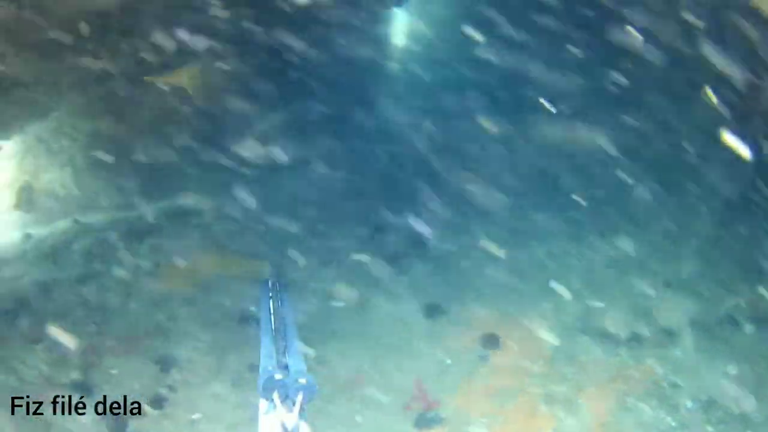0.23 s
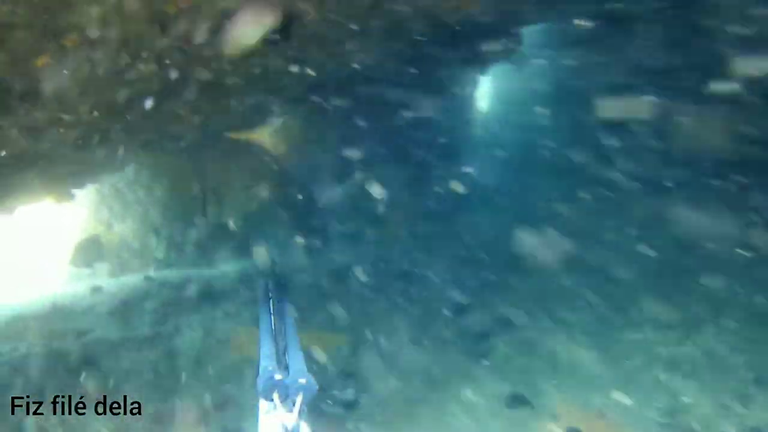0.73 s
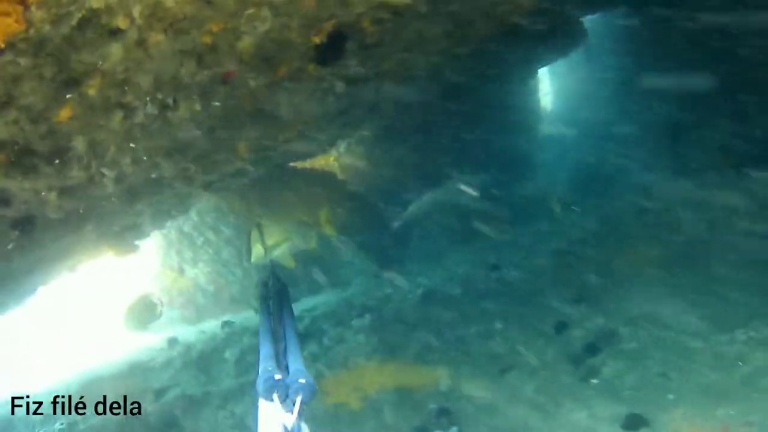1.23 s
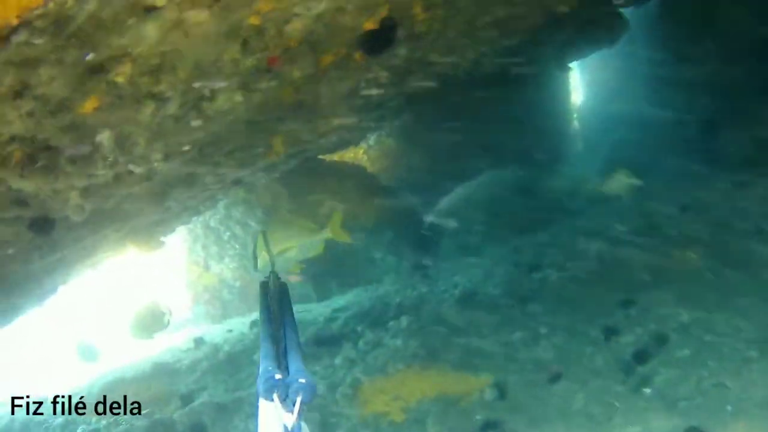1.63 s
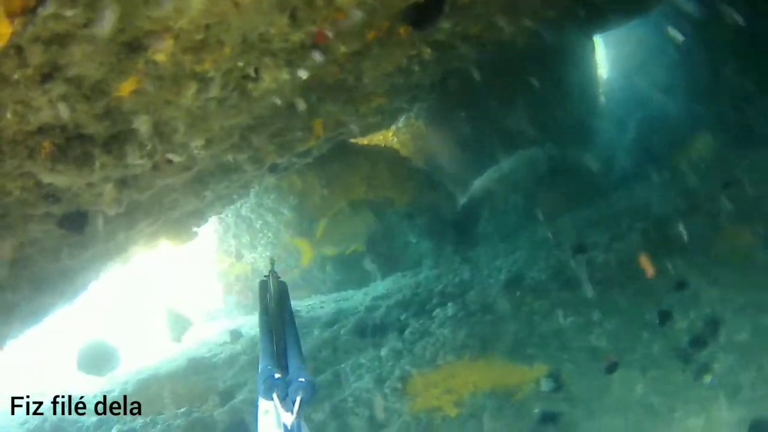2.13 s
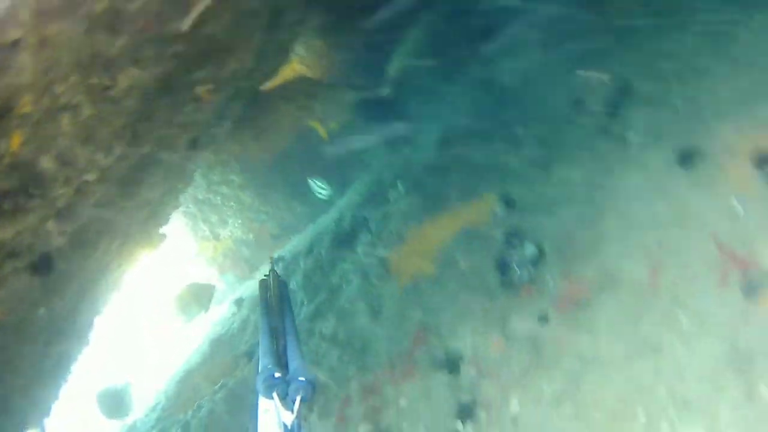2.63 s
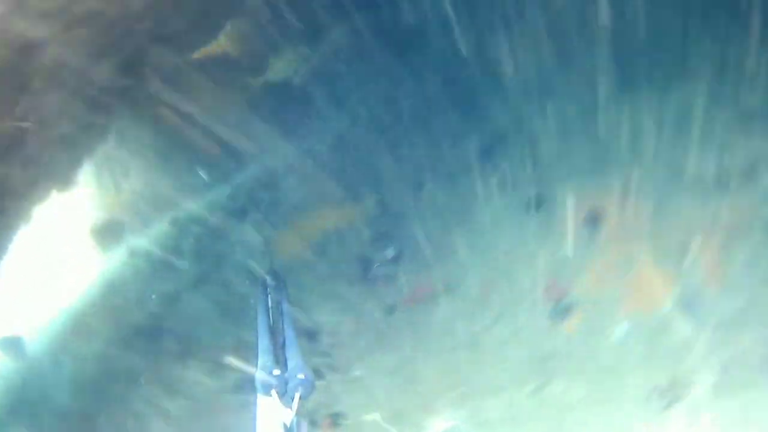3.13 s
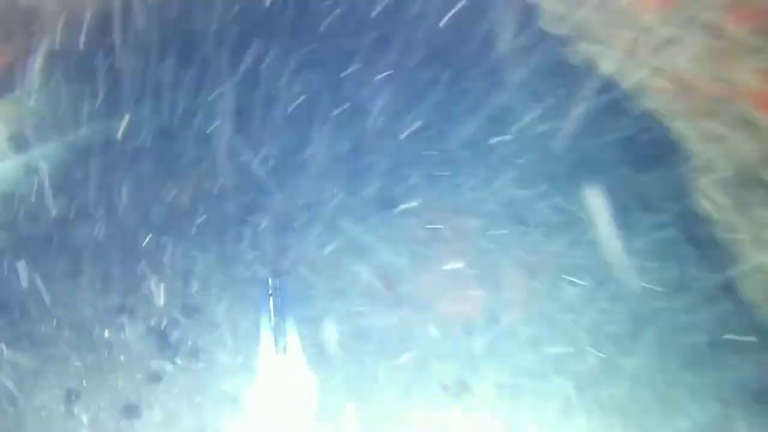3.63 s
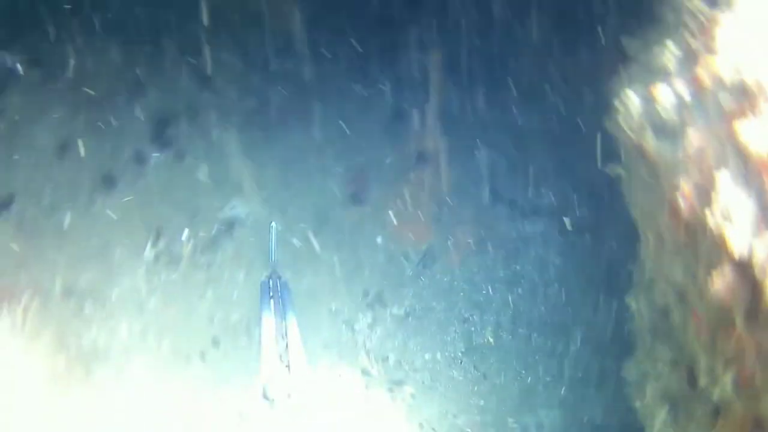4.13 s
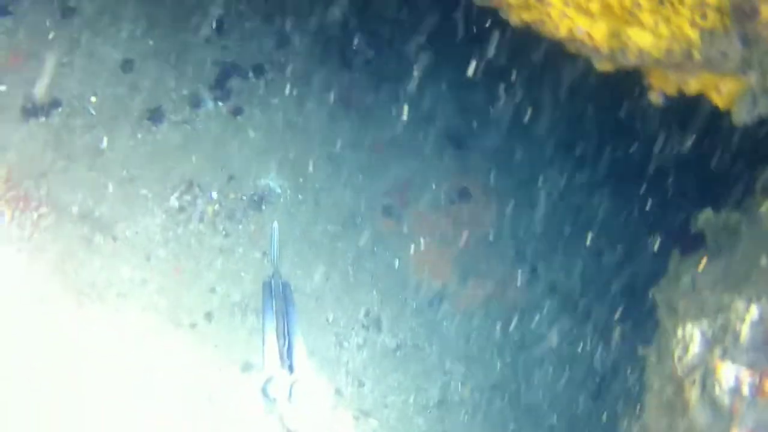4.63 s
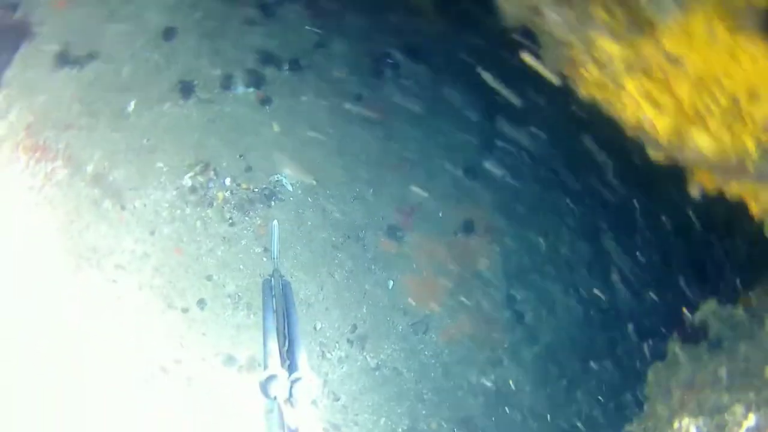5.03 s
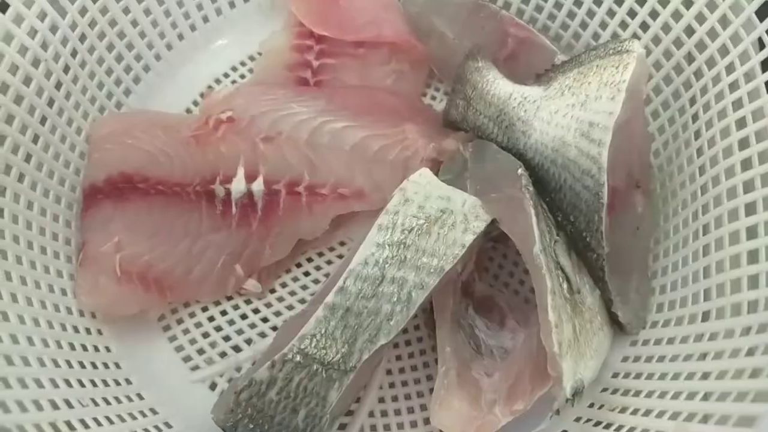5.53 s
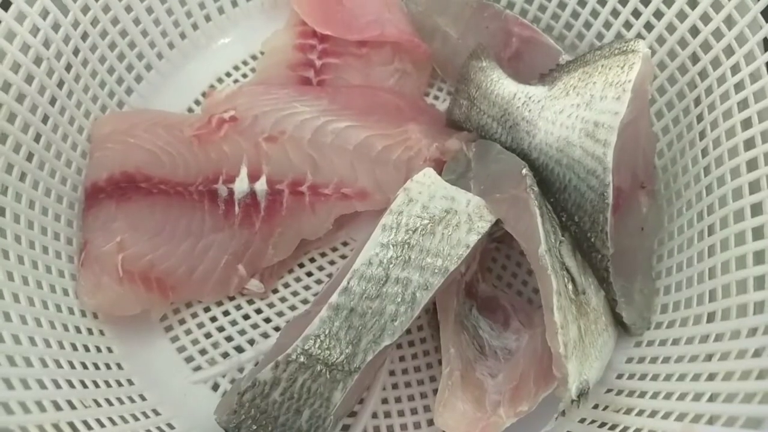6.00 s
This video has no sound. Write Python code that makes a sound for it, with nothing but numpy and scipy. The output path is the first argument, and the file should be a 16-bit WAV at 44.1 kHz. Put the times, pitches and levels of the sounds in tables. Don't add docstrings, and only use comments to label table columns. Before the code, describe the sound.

Muffled underwater crackle with sparse ticks, growing gear knocks, one very loud low thump with scraping, then a fridge hum and thin room hiss.

```python
import sys
import numpy as np
from scipy import signal
from scipy.fft import rfft, irfft, next_fast_len
from scipy.io import wavfile
from scipy.ndimage import uniform_filter1d, map_coordinates

SR = 44100
rng = np.random.default_rng(int(sys.argv[2]) if len(sys.argv) > 2 else 0)


def volts_from_db(level):
    exponent = np.asarray(level, float) / 20
    return 10 ** exponent


def waveform_to_disk(signal):
    frames = np.transpose(np.atleast_2d(signal))
    scaled = np.clip(frames, -1, 1) * 32767
    samples = np.round(scaled).astype(np.int16)
    wavfile.write(sys.argv[1], SR, samples)


N = 276177
CUT_S, KITCHEN_IN_S = 5.45952, 5.498

# [f/Hz, t60/s]
CASE_MODES = [(716.55, 0.0528), (1647.5, 0.0311), (2066, 0.02436), (2428, 0.01895), (3317.6, 0.0284),
              (1052, 0.017), (3913.3, 0.013)]

# [f/Hz, level/dB per Hz]
CRACKLE_SPECTRUM = [(260, -44.5), (450, -24), (568, -7), (704, -1), (1180, -14.5), (1350, -15),
                    (1640, -2.5), (1920, -16), (2350, -9), (2880, -14.5), (3470, -13), (3940, -17.5),
                    (4600, -29), (5980, -77), (10100, -120)]
MURMUR_SPECTRUM = [(40, -35), (70, -4.5), (150, 1.5), (300, -3.5), (500, -5.5), (900, -34), (1300, -78)]
CRACKLE_DB, STIRRED_DB = -72, -21.5
CHORUS_DB, CHORUS_S = 3, 0.04

# [t/s, level/dB]
SURGE = [(0, -50), (.07, -47.5), (.14, -57), (.42, -61.5), (.61, -47.5), (.93, -57.5), (1.03, -48.5),
         (1.5, -59), (1.6, -46), (1.87, -60), (1.95, -49), (2.08, -65.5), (2.33, -48), (2.45, -62.5),
         (2.72, -50), (2.87, -57.5), (3.09, -47), (5.46, -49)]
# [f/Hz, level/dB per Hz]
SWAY_SPECTRUM = [(6, -30), (14, -4), (24, 0), (36, -1), (46, -7), (56, -18), (100, -30), (160, -70)]
# [t/s, peak level/dB, build/s, t60/s]
SHOVES = [
    (3.21, -37, .04, .3),
    (3.53, -41, .03, .25),
    (4.092, -21, .04, .3),
    (4.246, -10.5, .11, .58),
    (5.318, -25, .03, .4),
    (5.444, -33, .015, .3),
]
MOUNT_HZ = 18.8

# [t/s, peak level/dB, low mode over peak/dB, upper modes over peak/dB]
SNAPS = [(.003, -49.5, -3.5, -4.5), (.4052, -52.5, -4.5, -1), (.4581, -55, -22, 5),
         (1.0422, -46, -19, -5.5), (1.0554, -49, -9, -3), (1.4595, -47.5, -11.5, -6),
         (1.777, -46.5, -17.5, -3.5), (1.881, -49, -3.5, 6.5), (2.2575, -39.5, -3.5, -2.5),
         (2.323, -49, -25, 1.5), (2.4411, -48, -9.5, 1.5), (2.4654, -44.5, -9.5, -4.5),
         (2.6522, -43.5, -8, -1), (2.9259, -41, -2, -0.5), (2.9707, -37, -20, -6.5), (3.1953, -46, -1.5, 0),
         (3.3219, -49, -26.5, 1), (3.4662, -49, -8.5, 1), (4.014, -50, -1.5, 3.5), (4.0966, -26, 4, -7),
         (4.1142, -45.5, 5, 0.5), (4.5347, -29.5, -17.5, -6), (4.5557, -38.5, -5, -7),
         (4.6466, -46, -1.5, 2), (4.7175, -44, -4, -5.5), (4.8019, -39.5, 2, -6.5), (4.8535, -36.5, -9, 3),
         (4.95, -34.5, 7.5, -15.5), (5.0155, -51, 7.5, -0.5), (5.4284, -42, -26.5, 4.5)]
# [t/s, peak level/dB]
TICKS = [(.011, -53), (.1157, -62), (1.705, -55.5), (.167, -60), (.2644, -58.5), (.294, -57.5),
         (.3429, -55), (.3792, -57), (.4917, -51), (.5375, -60.5), (.8546, -57), (1.0763, -53),
         (1.1222, -51.5), (1.1609, -55.5), (1.3069, -57.5), (1.4119, -63.5), (1.6241, -53.5),
         (1.6558, -53.5), (1.8498, -57), (1.9111, -59.5), (1.9281, -52), (2.0025, -56), (2.1441, -59.5),
         (2.7066, -58), (2.7388, -57), (2.825, -56.5), (3.3475, -51), (3.4008, -51.5), (3.8945, -52.5),
         (5.1495, -50), (.0548, -57.5), (.1446, -61), (.2094, -65.5), (.5641, -65.5), (.6065, -63.5),
         (.6559, -63.5), (.7417, -69), (.7771, -66), (.8126, -62.5), (.839, -66), (.8974, -60.5),
         (1.0046, -63), (1.292, -64), (1.3473, -67.5), (1.5833, -62.5), (1.7539, -63), (1.9579, -56.5),
         (1.9909, -62), (2.0652, -65.5), (2.1221, -70), (2.1999, -58), (2.4114, -63.5), (2.4304, -56.5),
         (2.5356, -65), (2.5795, -65.5), (2.6229, -77), (2.7736, -58.5), (3.8731, -57), (3.9344, -61),
         (4.0532, -54)]
# [t/s, peak level/dB, low mode over peak/dB, upper modes over peak/dB]
TAPS = [(.076, -40, -10.5, -4.5), (1.2531, -62, 5, -4), (1.4908, -39.5, -3.5, -1.5),
        (1.5353, -43.5, -10, -3), (2.3094, -58, -3, 7.5), (2.382, -52, -9, 3.5), (2.4923, -55.5, -6, -3),
        (2.902, -26, -6.5, 0), (3.0373, -21.5, -27.5, -11), (3.087, -44, 13, 0.5),
        (3.1271, -47.5, 5, -14.5), (3.1533, -37, -4.5, 4), (3.2497, -47, -13, -14), (3.5107, -57, 1.5, 2.5),
        (3.5607, -48.5, -5, -2), (3.5879, -41, -13, 1.5), (3.6204, -42, -8, -10.5),
        (3.6878, -41, -13.5, -5), (3.7303, -38.5, -12, -8.5), (3.7863, -54, -2, -3.5),
        (3.9655, -35, -12, 2), (4.162, -42.5, 8, -9), (4.2103, -36.5, -1.5, -8.5), (4.2572, -31.5, 10, 3),
        (4.3129, -42.5, 28.5, 16), (4.5092, -42, -12, -3.5), (4.755, -38.5, -12.5, -8),
        (4.9943, -46, 5.5, 1), (5.2483, -47, -1, 0), (5.3388, -55.5, 8.5, 5.5), (2.9587, -45.5, -8, -2),
        (3.2944, -54, -11.5, -3.5), (3.5473, -53.5, -8.5, -5.5), (3.696, -44.5, -5, 2),
        (3.706, -49.5, -8.5, -1), (4.223, -45.5, -7.5, 1), (4.236, -44, -10, 1), (4.291, -34, -4, 3),
        (4.3071, -31.5, -5.5, 2.5), (4.3595, -39, 1.5, -5.5), (4.6304, -53, -9, -3.5),
        (4.822, -49.5, -4.5, -1.5), (4.9082, -57.5, -5, -3.5), (5.0943, -61.5, -5.5, -3),
        (5.1337, -56.5, -5.5, -4), (5.1846, -52.5, 3, -2), (5.2355, -54, -8.5, -7.5),
        (5.3073, -55.5, -4, 0.5)]
# [t/s, peak level/dB, low mode over peak/dB, upper modes over peak/dB]
PINGS = [(2.972, -53.5, -19.5, -6), (3.017, -54.5, -19, -3), (3.196, -48, -21, -3),
         (4.4313, -60.5, -20, -3.5), (4.65, -52, -20.5, -2.5), (4.855, -48.5, -20, -5.5),
         (5.35, -56, -20, -1.5), (5.3806, -54.5, -21.5, -4.5)]
TICK_LOW_DB, TICK_UPPER_DB, TICK_STRAY_DB = -11.5, -2.5, 4
SHARP_TOP_DB, BLUNT_TOP_DB, PING_TOP_DB = -3.5, -13.5, 8

# [t/s, peak level/dB, f/Hz, t60/s]
KNOCKS = [(2.902, -29.5, 990, 0.0211), (3.129, -20.5, 530, 0.01335), (3.153, -26, 392, 0.0242),
          (3.697, -36.5, 620, 0.024), (4.197, -37, 215, 0.11), (3.640, -32, 286, 0.073),
          (3.642, -29.5, 669, 0.063), (3.739, -27, 653, 0.0778), (3.741, -22, 303, 0.0365),
          (3.756, -19, 360, 0.0594), (3.768, -20, 293.3, 0.084), (3.776, -28, 210.8, 0.09),
          (4.099, -16.5, 222.5, 0.0727), (4.104, -8, 526, 0.023), (4.164, -25, 298, 0.039),
          (4.225, -22, 254, 0.031), (4.261, -10.5, 203.5, 0.081), (4.264, -18, 575, .06),
          (4.692, -39, 652, 0.0596), (4.95, -34, 195, 0.1264), (4.279, -21, 339, 0.11),
          (4.3165, 0.5, 182.6, 0.0843), (4.332, -25.5, 585, 0.075), (4.339, -17.5, 203, 0.175),
          (4.383, -27, 258, 0.065), (4.796, -34, 215.6, 0.136), (4.949, -18.5, 429.5, 0.0475),
          (4.951, -17.5, 928, .02), (5.273, -39, 410, 0.073), (5.330, -25, 394, 0.022),
          (5.331, -40, 694, .04), (5.342, -35.5, 312, 0.053), (5.357, -40, 252, 0.058),
          (5.275, -41, 685, .05), (4.902, -38, 368.9, .06), (4.753, -42, 229, .06),
          (4.649, -47, 213.6, 0.048), (3.196, -38.5, 301, 0.051), (3.039, -41, 328, 0.045),
          (4.372, -34, 715, .05), (.63, -63, 523, 0.059), (1.195, -56, 713, 0.068),
          (1.205, -61, 484, 0.054), (1.98, -60, 693, 0.055), (2.133, -63, 436, .06),
          (2.292, -56, 763, 0.058), (3.367, -51.5, 716.8, 0.092), (3.514, -53, 726, 0.1)]
# [t/s, peak level/dB, f/Hz, t60/s]
THUDS = [
    (4.255, -21, 41.6, 0.15),
    (4.306, -20, 35, .058),
    (2.8, -61.5, 150, 0.29),
    (5.2, -45.5, 143, 0.109),
]
# [t/s, peak level/dB]
CLUNKS = [(3.367, -39), (3.514, -39.5), (3.622, -43.5)]
CLUNK_HZ, CLUNK_T60_S = 484.5, 0.0886
# [t/s, force/dB]
SCRAPE = [
    (4.24, -56.5),
    (4.256, -22),
    (4.33, -11),
    (4.4, -53),
]
# [f/Hz, level/dB per Hz]
DRAG_SPECTRUM = [(200, -10.5), (400, -2.0), (600, 3.5), (800, -16.0), (1100, -14.0), (1500, -60.0)]
RASP_SPECTRUM = [(900, -11.0), (1500, -3.0), (1900, 3), (2400, -15), (3300, -17), (4100, -25.0),
                 (4500, -53.0), (4800, -100)]
RASP_DB, RASP_GROWS = -27, 1.4
# [t/s, swell by 20 dB/s, fade by 20 dB/s, rub level/dB, rustle level/dB]
STROKES = [(2.42, .35, .3, -65, -82), (2.94, 0.1087, 0.1033, -52, -54.5),
           (3.055, 0.0518, 0.3437, -50.5, -56.5), (3.159, 0.3319, 0.2878, -45.5, -61.5),
           (3.27, 0.2828, 0.25, -50, -65), (3.601, 0.1521, 0.1755, -57, -58),
           (3.64, 0.1721, 0.0426, -52.5, -58), (3.7, 0.1852, 0.055, -51.5, -58),
           (3.93, 0.2161, 0.22, -59, -67), (4.03, 0.21, 0.01, -62.5, -65.5), (4.13, 0.0549, 0.34, -40, -70),
           (4.28, 0.0704, 0.124, -26, -65), (4.65, 0.26, 0.14, -57.5, -61.5), (4.72, 0.5732, 1.5, -53, -68),
           (4.831, 0.1936, 0.1778, -44.5, -62), (4.96, 0.13, 0.2351, -40, -58.5),
           (5.029, 0.2666, 0.09, -44, -59.5), (5.33, 0.3267, 0.22, -51, -63.5)]
RUSTLE_STEEPER = 1.312
# [f/Hz, level/dB per Hz]
RUB_SPECTRUM = [(41, -49), (70, -3), (129, -3), (392, 2), (546, -6.5), (714, -0.5), (797, -14.5),
                (1300, -28), (1690, -45.5), (2860, -120)]
RUSTLE_SPECTRUM = [(600, -38), (950, 8), (1400, -2.5), (2100, 5.5), (2700, -7.5), (3600, -11), (4600, -61)]

# [t/s, half length/s, shortage/dB]
STARVED = [(.045, 0.0123, 10.5), (.24, 0.0133, 10.5), (.99, 0.0167, 11), (1.385, 0.0176, 11.5),
           (1.59, 0.018, 5), (1.745, 0.0104, 9.5), (3.005, .012, 10.5), (3.07, 0.019, 6.5),
           (3.26, 0.041, 10), (4.14, .012, 10.5), (4.16, .01, -4.5), (4.19, 0.0122, 17),
           (4.395, 0.0145, 14.5), (4.441, 0.0196, -9.5), (4.501, 0.0183, -10), (4.68, .02, -5.5),
           (4.6, 0.017, 4.5), (4.905, 0.023, 17), (4.96, .015, -7.5), (5.11, 0.028, 6), (5.29, .02, 6.5),
           (5.405, 0.0111, 8), (2.097, 0.0198, 12), (2.229, .012, 8), (2.36, 0.0117, 3.5),
           (2.418, 0.0115, 10.5), (2.687, 0.0144, 5.5), (2.754, .03, 9), (3.542, 0.0115, 10.5),
           (3.767, 0.0196, -4), (4.1, .012, -6), (1.21, .02, 8), (4.54, .02, -5), (3.929, 0.0157, 10.5),
           (4.061, 0.0148, 16)]

# [f/Hz, level/dB per Hz]
AIR_SPECTRUM = [(15, -52), (42, -1.5), (82, -5.5), (148, 3), (274, -7.5), (350, -2), (970, -6.5),
                (1420, -8.5), (2100, -16.5), (2900, -16.5), (4000, -16.5), (4600, -20.5), (5500, -50.5),
                (7000, -100)]
HISS_SPECTRUM = [(3500, -60.5), (4800, 1.5), (6200, -4), (7000, -5), (8000, -6), (9500, -8), (11000, -9),
                 (15700, -11.5)]
FIZZ_SPECTRUM = [(6500, -47), (8200, 3), (10800, -2.5), (13000, -38)]
# [f/Hz, mid level/dB, side level/dB]
MOTOR = [(68.5, -15, -19.5), (116.9, 1.5, -4), (334, -40, -18.5), (999, -17.5, -41), (1196, -19, -40.5),
         (1407, -22.5, -31)]
# [f/Hz, level/dB]
DIFFUSE = [(60, -6), (290, 1), (700, -6), (1500, -2), (3300, -1), (4700, -12), (7000, -4), (10000, -1),
           (14000, -4)]
# [f/Hz, level/dB]
LEAN = [(100, 8.5), (700, 0), (15000, -2)]
LAG_S, LAG_FROM_HZ = .00044, 1340
AIR_DB, HUM_DB, HISS_DB = -48.5, -46.5, -63
FIZZ_S, FIZZ_DB, FIZZ_HALF_S, FIZZ_LIFT_DB = 6.17, -64.5, 0.055, 3.5
FADE_S, FADE_CURVE = 0.243, 0.694
HUM_FADE_S, HUM_GROWS_DB_PER_S = 0.174, 3
DROP_DB, DROP_FROM_BAND = -12, 24


def unit(x):
    return x / np.sqrt(np.mean(x ** 2) + 1e-20)


def smooth(rule):
    t = np.arange(0, N / SR + .002, .002)
    return np.array([np.interp(np.arange(N) / SR, t, row) for row in np.atleast_2d(rule(t))])


def curves(rows):
    s, *cols = np.transpose(rows)
    return [np.interp(np.arange(N) / SR, s, c, left=-150, right=-150) for c in cols]


def wobble(rate):
    knots = rng.standard_normal(int(N * rate / SR) + 4)
    return smooth(lambda t: map_coordinates(knots, [t * rate]))[0]


def along(points, hz):
    f, v = np.transpose(points)
    return np.interp(np.log(hz + 1), np.log(f + 1), v)


def filtered(x, response):
    m = next_fast_len(N + 8192)
    return irfft(rfft(x, m) * response(np.fft.rfftfreq(m, 1 / SR)), m)[..., :N]


def coloured(x, spectrum):
    return unit(filtered(x, lambda hz: volts_from_db(along(spectrum, hz))))


def grit(rate, spread_db, share):
    hits = rng.random(N) < rate / SR
    signs = rng.choice([-1, 1], size=N)
    sizes = volts_from_db(spread_db * np.tanh(rng.standard_normal(N)))
    return unit(hits * signs * sizes) + share * rng.standard_normal(N)


def add_ring(track, s, db, hz, t60, attack, rough, size):
    drift, flutter = uniform_filter1d(rng.standard_normal((2, size)), size=130, axis=1) * np.sqrt(130)
    t = np.arange(size) / SR
    turn = 2 * np.pi * np.cumsum(hz * (1 + 0.474 * rough * drift)) / SR
    envelope = volts_from_db(db - 60 * t / t60) * (1 - np.exp(-t / attack)) ** 2
    ring = envelope * (1 + rough * flutter) * np.sin(turn)
    track[round((s - attack) * SR):][:size] += ring


def strokes():
    slope_db = 20 * np.array([[1], [RUSTLE_STEEPER]])

    def stroke_db(t, s, swell, fade, rub_db, rustle_db):
        return np.array([[rub_db], [rustle_db]]) - slope_db * np.maximum((s - t) / swell, (t - s) / fade)

    return smooth(lambda t: volts_from_db(np.max([stroke_db(t, *row) for row in STROKES], axis=0)))


def reef():
    crackle = coloured(grit(rate=220, spread_db=8, share=.62), CRACKLE_SPECTRUM)
    swell_db, clumps_db = 1.2 * wobble(6), 1.8 * wobble(25)
    murmur = volts_from_db(-73.5 + swell_db) * coloured(rng.standard_normal(N), MURMUR_SPECTRUM)

    def answer(t, s, db):
        return np.clip((db + 65.5) / 12, 0, 1) * np.exp(-((t - s) / CHORUS_S) ** 2)

    chorus, = smooth(lambda t: sum(answer(t, s, db) for s, db, *_ in SNAPS + TICKS))
    stirred = volts_from_db(STIRRED_DB) * np.minimum(strokes()[0], volts_from_db(-50.5))
    busy = volts_from_db(CRACKLE_DB + CHORUS_DB * chorus) + stirred
    return busy * volts_from_db(clumps_db) * crackle + murmur


def mount():
    t = np.arange(N) / SR
    current_db = curves(SURGE)[0] - 2.5 + 1.1 * wobble(9.1)
    sway = volts_from_db(current_db) * coloured(rng.standard_normal(N), SWAY_SPECTRUM)
    for s, db, build, t60 in SHOVES:
        age = np.clip(t - s, 0, None)
        swing = np.minimum(age / build, 1) * volts_from_db(db - 60 * np.clip(age - build, 0, None) / t60)
        sway += swing * np.sin(2 * np.pi * MOUNT_HZ * age)
    return sway


def snaps():
    track = np.zeros(N + SR)
    strays_db = TICK_STRAY_DB * rng.uniform(-1.1, 1, (len(TICKS), 2))
    ticks = [(s, db, TICK_LOW_DB + low, TICK_UPPER_DB + upper)
             for (s, db), (low, upper) in zip(TICKS, strays_db)]
    for table, top_db in ((SNAPS + ticks, SHARP_TOP_DB), (TAPS, BLUNT_TOP_DB), (PINGS, PING_TOP_DB)):
        for s, db, low_db, upper_db in table:
            blend = (low_db + 8, 5.7, upper_db + 6.5, upper_db + 4.0, upper_db + top_db + 5,
                     low_db / 2 - 1, upper_db + top_db + 3.5)
            for (hz, t60), mode_db in zip(CASE_MODES, blend):
                pitch = hz * (1 + .01 * rng.standard_normal())
                add_ring(track, s, db + mode_db, pitch, t60, attack=.001, rough=.09, size=SR // 22)
    return track[:N]


def gear():
    track = np.zeros(N + SR)
    clunks = [(s, db, CLUNK_HZ, CLUNK_T60_S) for s, db in CLUNKS]
    for s, db, hz, t60 in KNOCKS + THUDS + clunks:
        add_ring(track, s, db + 4, hz, t60, attack=.0012, rough=.11, size=SR // 6)
    force_db, = curves(SCRAPE)
    drag = volts_from_db(force_db - 4.5) * coloured(grit(rate=1200, spread_db=9.5, share=0.53), DRAG_SPECTRUM)
    rasp_db = RASP_DB + RASP_GROWS * (force_db - force_db.max())
    rasp = volts_from_db(rasp_db) * coloured(grit(rate=1000, spread_db=1.0, share=1.0), RASP_SPECTRUM)
    rubbing, rustling = strokes()
    unsteady = np.tanh(wobble(25))
    rub = coloured(grit(rate=300, spread_db=3.0, share=0.94), RUB_SPECTRUM)
    rub *= rubbing * volts_from_db(1.5 + 2.6 * unsteady)
    rustle = coloured(grit(rate=310, spread_db=7, share=0.55), RUSTLE_SPECTRUM)
    rustle *= rustling * volts_from_db(6.5 + 2 * unsteady + 1.6 * wobble(27))
    return track[:N] + drag + rasp + rub + rustle


def dive_camera(x, top=.655, hard=8, grain_db=-15):
    x = x / (1 + np.abs(x / top) ** hard) ** (1 / hard)
    hz, when, z = signal.stft(x, SR, nperseg=1536)
    band = (hz // 345).astype(int)
    power = np.array([np.mean(np.abs(z[band == b]) ** 2, axis=0) for b in range(band[-1] + 1)])
    masking = volts_from_db(-48) ** 2 * power[0] + volts_from_db(-38) ** 2 * power[1:].sum(axis=0)
    masking = np.minimum(masking, volts_from_db(-74) ** 2) + volts_from_db(-103) ** 2
    shortage_db = 1.0 * (np.arange(len(power))[:, None] - 8) + 2 * rng.standard_normal(z.shape[1])
    shortage_db = shortage_db + 6 * uniform_filter1d(rng.standard_normal(power.shape), size=3, axis=1)
    shortage_db = shortage_db + sum(db * np.exp(-((when - s) / half) ** 2) for s, half, db in STARVED)
    needed = (masking * volts_from_db(shortage_db) ** 2)[band]
    heard = (power[band] > needed) & (np.abs(z) ** 2 > needed) & (hz < 4500)[:, None]
    kept = heard | (hz < 900)[:, None]
    grain = volts_from_db(grain_db) * np.sqrt(power[band]) * np.exp(2j * np.pi * rng.random(z.shape))
    grain = grain * (band > 1)[:, None]
    return signal.istft((z + grain) * kept, SR, nperseg=1536)[1][:N]


def ports(spectrum):
    direct, *scatter = rng.standard_normal((3, N))

    def half_difference(hz):
        level = np.log(volts_from_db(along(LEAN, hz))) / 2
        phase = np.pi * LAG_S * np.clip(hz - LAG_FROM_HZ, 0, 4 / LAG_S)
        return np.array([[1], [-1]]) * (level + 1j * phase)

    pair = filtered(direct, lambda hz: np.exp(half_difference(hz)))
    pair = pair + filtered(np.array(scatter), lambda hz: volts_from_db(along(DIFFUSE, hz)))
    return coloured(pair, spectrum)


def kitchen():
    t = np.arange(N) / SR
    fade, hum_fade = (np.clip((t - KITCHEN_IN_S) / s, 0, 1) ** FADE_CURVE for s in (FADE_S, HUM_FADE_S))
    fizz = np.exp(-((t - FIZZ_S) / FIZZ_HALF_S) ** 2)
    air = volts_from_db(AIR_DB + 0.33 * wobble(12)) * ports(AIR_SPECTRUM)
    hiss = volts_from_db(HISS_DB + FIZZ_LIFT_DB * fizz + 1.4 * wobble(12)) * ports(HISS_SPECTRUM)
    room = fade * (air + hiss) + volts_from_db(FIZZ_DB) * fizz * ports(FIZZ_SPECTRUM)
    growth_db = HUM_GROWS_DB_PER_S * (t - KITCHEN_IN_S - FADE_S)
    for hz, mid_db, side_db in MOTOR:
        turn = 2 * np.pi * hz * t + 0.5 * wobble(8.9)
        size = hum_fade * volts_from_db(HUM_DB + growth_db + 1.02 * wobble(9))
        mid, side = volts_from_db(mid_db) * np.sin(turn), volts_from_db(side_db) * np.sin(turn - 1.1)
        room += size * (mid + side * [[1], [-1]])
    return room


def kitchen_camera(pair):
    start = round(CUT_S * SR)
    mid, side = signal.stft([[1, 0.999], [1, -1]] @ pair[:, start:] / 2, nperseg=2048)[2]
    strong, weak = (np.add.reduceat(np.abs(z) ** 2, np.arange(0, len(z), 8)) for z in (side, mid))
    kept = weak > strong * volts_from_db(DROP_DB + 3.5 * rng.standard_normal(weak.shape)) ** 2
    kept[:DROP_FROM_BAND] = True
    mid = mid * np.repeat(kept, 8, axis=0)[:len(mid)]
    heard = signal.istft(np.array([mid + side, mid - side]), nperseg=2048)[1][:, :N - start]
    return np.pad(heard, ((0, 0), (start, 0)))


def scene():
    t = np.arange(N) / SR
    dive = dive_camera(reef() + mount() + snaps() + gear())
    return dive * (t < CUT_S) + kitchen_camera(kitchen()) * (t > KITCHEN_IN_S)


def band_limit(x):
    return signal.sosfilt(signal.butter(12, 15710, fs=SR, output="sos"), x)


def record(dry):
    mix = dry + volts_from_db(-95.5) * rng.standard_normal(N)
    return band_limit(mix)


dry = scene()
out = record(dry)
waveform_to_disk(out)
```